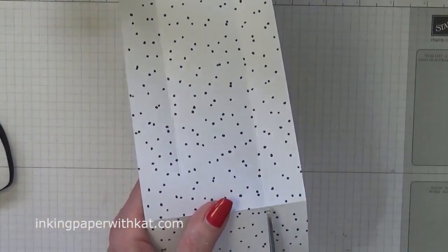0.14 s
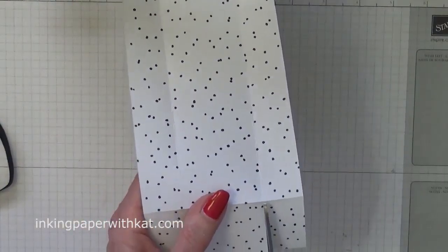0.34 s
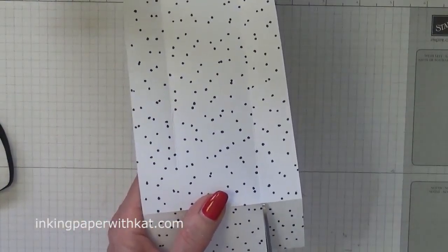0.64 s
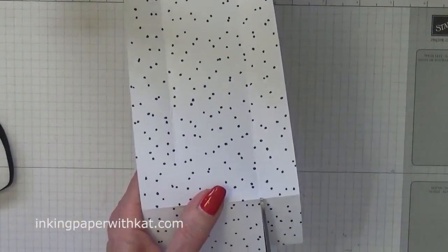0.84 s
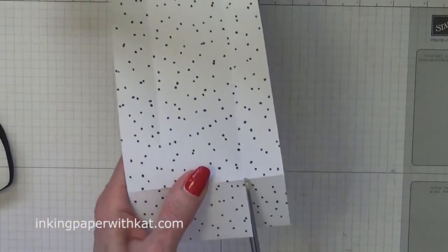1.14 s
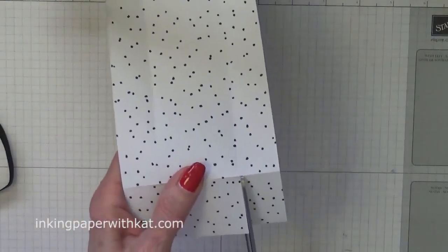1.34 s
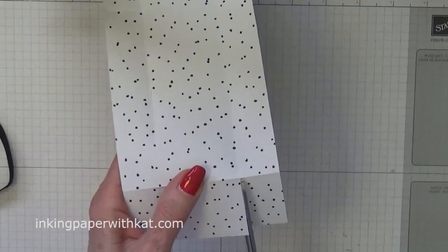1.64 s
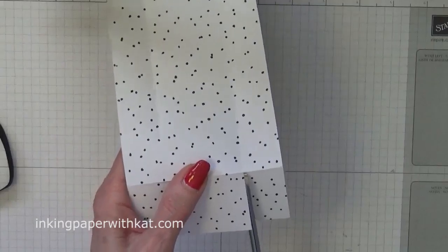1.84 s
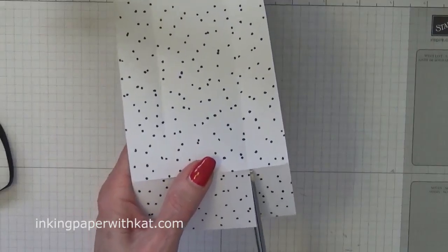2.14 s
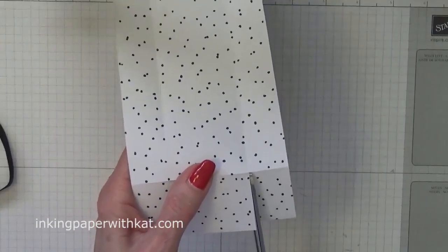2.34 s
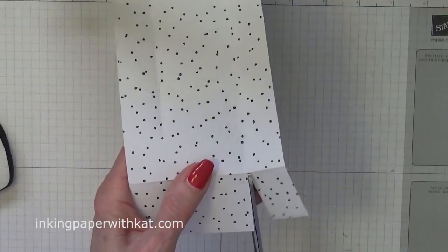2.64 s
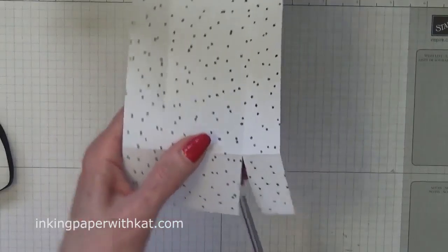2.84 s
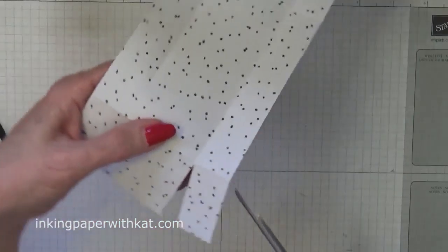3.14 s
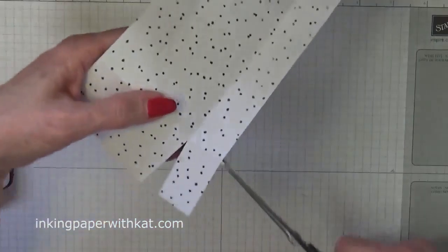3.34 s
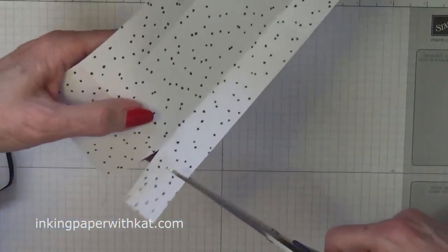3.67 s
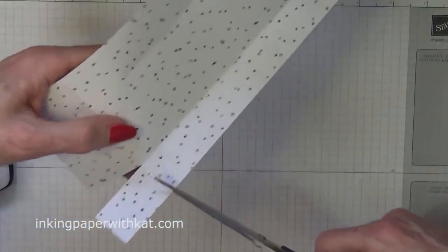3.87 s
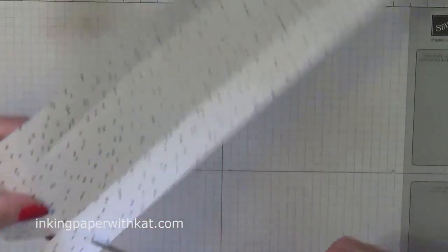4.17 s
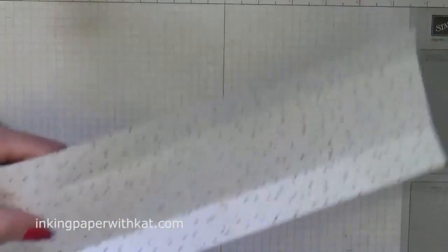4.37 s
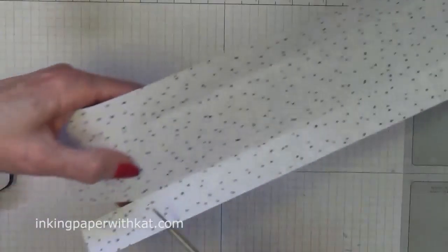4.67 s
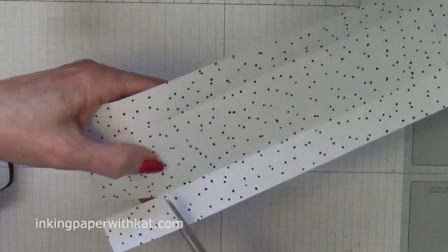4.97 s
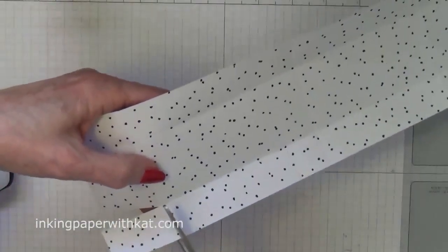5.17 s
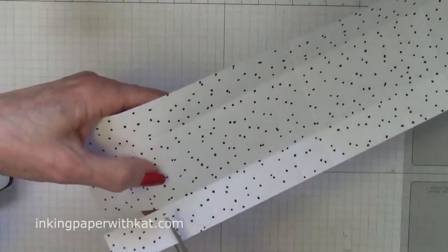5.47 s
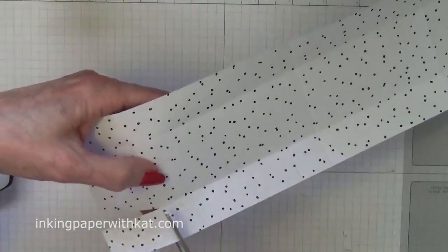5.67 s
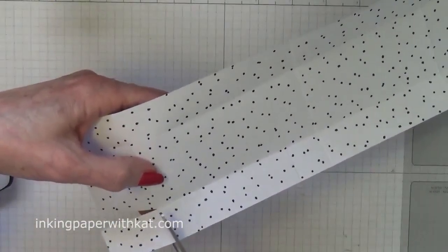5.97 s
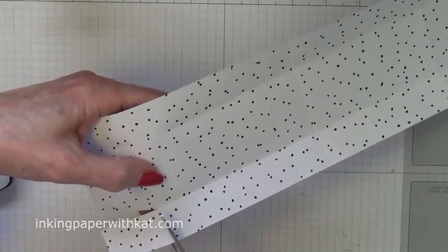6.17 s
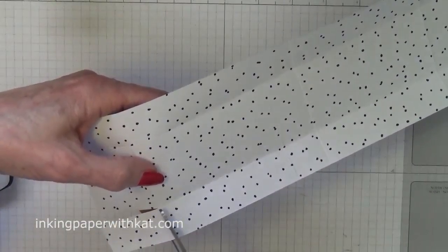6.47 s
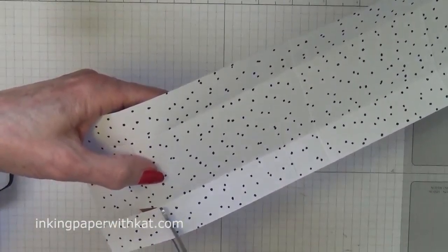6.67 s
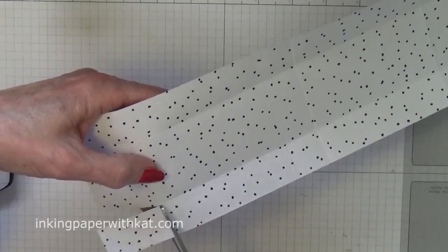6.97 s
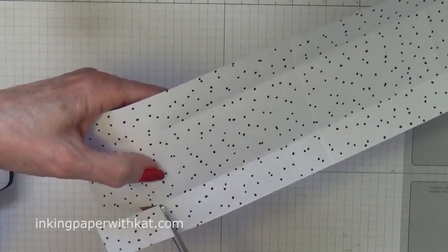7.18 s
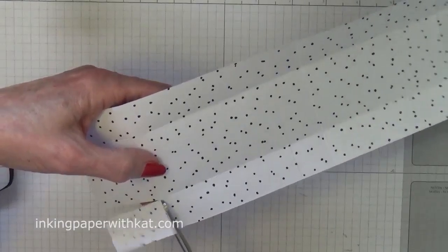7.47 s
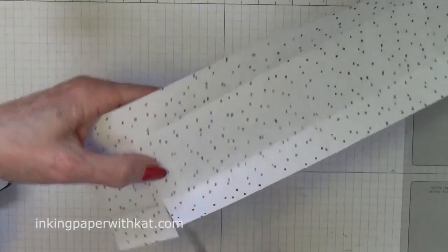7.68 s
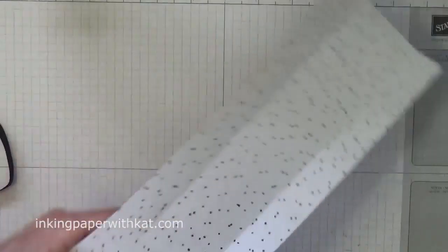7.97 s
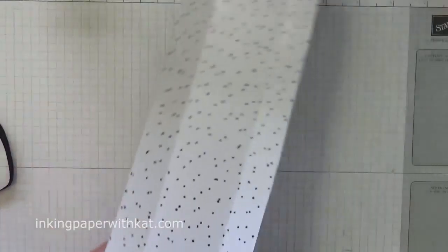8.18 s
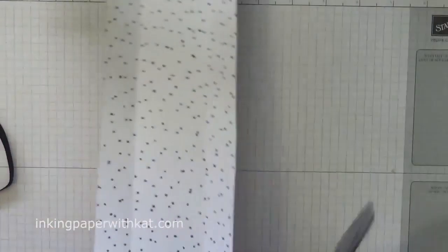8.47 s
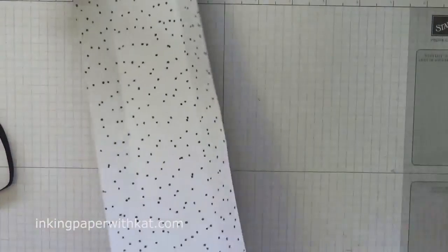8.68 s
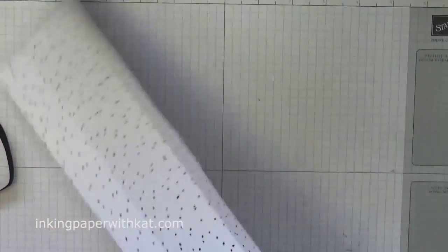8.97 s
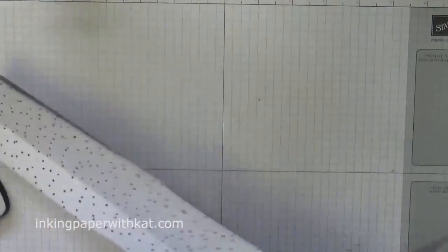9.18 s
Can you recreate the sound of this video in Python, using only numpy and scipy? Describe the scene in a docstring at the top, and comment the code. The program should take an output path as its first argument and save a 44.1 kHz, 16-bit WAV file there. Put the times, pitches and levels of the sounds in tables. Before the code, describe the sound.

Close by, above a table in a small room, scissors make sparse, soft snips in card, the blades sometimes clicking together. Louder sliding, crinkling and hollow popping take over as the sheet is shifted around. After a short lull the scissors bite again in quick little runs, then more card handling ends it. A low rumble, electrical hum, hiss and very faint ticking lie underneath.

```python
"""Scissors cutting card

Small scissors cut slowly into a creased sheet of card above a table in a small room. The blades part
the fibres in short cracks and now and then click together. The sheet buckles with hollow pops and rubs
on fingers, blades and table as it is turned. Behind it lie a low rumble, mains hum, hiss and faint ticks."""
import sys
import numpy as np
from scipy import signal
from scipy.fft import rfft, irfft
from scipy.io import wavfile

SR = 44100
rng = np.random.default_rng(int(sys.argv[2]) if len(sys.argv) > 2 else 0)


def waveform_to_disk(signal):
    """Save audio, clipped to [-1, 1], as 16-bit WAV at the path in sys.argv[1]."""
    frames = np.transpose(np.atleast_2d(signal))
    scaled = np.clip(frames, -1, 1) * 32767
    samples = np.round(scaled).astype(np.int16)
    wavfile.write(sys.argv[1], SR, samples)


N = 411012
TIME = np.arange(N) / SR
OPPOSITE_SIDES = np.array([[1], [-1]])  # plus on the left, minus on the right


def undb(db):
    """Turn decibels into a number to multiply by."""
    return 10 ** (np.asarray(db) / 20)


def level(x, db):
    """Scale a sound to an average (rms) level."""
    return x * undb(db) / np.sqrt(np.mean(x ** 2) + 1e-30)


def energy(x, db):
    """Give a sound as much energy as one second at this level."""
    return x * undb(db) / np.sqrt(np.sum(x ** 2) / SR + 1e-30)


def band(x, hz, kind, order=3):
    """Keep the lows, the highs or a band between."""
    return signal.sosfilt(signal.butter(order, hz, kind, fs=SR, output="sos"), x)


def ring(x, hz, width):
    """Make a sound ring at one pitch; narrower rings longer."""
    return signal.lfilter(*signal.iirpeak(hz, hz / width, fs=SR), x)


def colour(x, points, size=4096):
    """Shape the tone along a curve of (frequency [Hz], level [dB]) points."""
    hz, db = np.transpose(points)
    curve_db = np.interp(np.log(np.fft.rfftfreq(size, 1 / SR) + 1), np.log(hz), db)
    cepstrum = irfft(np.log(undb(curve_db)))
    # fold the filter so that it never sounds before its input
    cepstrum[1:size // 2] *= 2
    cepstrum[size // 2 + 1:] = 0
    response = irfft(np.exp(rfft(cepstrum)))
    return signal.fftconvolve(x, response)[:len(x)]


def add(out, start, x):
    """Mix a sound in at a start time in seconds."""
    i = int(start * SR)
    out[i:i + len(x)] += x[:N - i]


def clock(length):
    """The times within one event, plus 40 ms to ring out."""
    return np.arange(int(length * SR) + SR // 25) / SR


# The tone of the steady hiss: (frequency [Hz], relative level [dB])
AIR_TONE = [(38, -13), (65, -10), (126, -3), (150, -8), (236, -10.5), (268, -12.5), (286, -8.5),
            (378, -11.5), (459, -13), (568, -15), (1130, -15), (1770, -18), (3680, -21), (4460, -23),
            (11000, -26.5), (14300, -67), (22000, -120)]
def air(db=-60.56, side_db=-9):
    """Room air hisses; a second noise makes left and right differ."""
    centre, side = (level(colour(rng.standard_normal(N), AIR_TONE), db) for _ in range(2))
    return band(centre, 72, "high") + undb(side_db) * band(side, 160, "high", order=1) * OPPOSITE_SIDES


# How loud the deep rumble is: (time [s], level [dB])
RUMBLE_LEVELS = [(0, -68), (.4, -61.5), (1.05, -59), (1.4, -68), (1.75, -58), (2.1, -67), (2.6, -61.5),
                 (2.9, -65), (3.25, -57), (3.65, -57), (4.35, -68.5), (7.1, -69), (9.301, -67.5)]
# How loud the faint drone above it is: (time [s], level [dB])
DRONE_LEVELS = [(0, -69), (7, -74.5), (7.15, -61.5), (8.2, -66), (8.4, -78)]
def rumble(rumble_hz=44.7, drone_hz=80):
    """Two low, narrow bands of noise swell and sink."""
    out = np.zeros(N)
    for hz, width, curve in (rumble_hz, 13, RUMBLE_LEVELS), (drone_hz, 14, DRONE_LEVELS):
        noise = ring(ring(rng.standard_normal(N), hz, width), hz, width)
        out += level(noise, 0) * undb(np.interp(TIME, *np.transpose(curve)))
    return out


def mains_hum(hz=120, db=-72):
    """Mains power hums on one steady note."""
    return level(np.sin(2 * np.pi * hz * TIME), db)


def ticking(per_second=29.97, hz=3700, decay_s=.0015, db=-75, weak_db=-6, scatter_db=1.5):
    """Faint, fast ticks, strong and weak in turn."""
    out, t = np.zeros(N), clock(0)
    tick = t * np.exp(-t / decay_s) * np.sin(2 * np.pi * hz * t)
    for k, start in enumerate(np.arange(.0585, N / SR, 1 / per_second)):
        add(out, start, tick * undb(weak_db * (k % 2) + scatter_db * rng.standard_normal()))
    return level(out, db)


def room(x, low_fade_s=.32, high_fade_s=.23, echo_db=-8, delay_s=.0048):
    """The table and near walls add a short echo; its highs differ most between left and right."""
    t = np.arange(SR // 2) / SR
    centre, side = rng.standard_normal((2, len(t)))
    side = side * OPPOSITE_SIDES
    low = undb(2.5 - 60 * t / low_fade_s) * band(centre + undb(-5) * side, 3250, "low")
    high = undb(-60 * t / high_fade_s) * band(centre + undb(-1) * side, 2460, "high")
    tail = (low + high) * (t > delay_s)
    tail *= undb(echo_db) / np.sqrt(np.sum(tail ** 2) / 2)
    return x + signal.fftconvolve(x[None], tail, axes=1)[:, :N]


# The card rings in three ranges: body (low), middle and fizz (high). Each grip sets their pitches:
# (from time [s], body [Hz], middle [Hz], fizz [Hz])
GRIP_PITCHES = [(0, 640, 1930, 7000), (.5, 585, 3000, 6600), (.68, 860, 2300, 7560), (1.1, 585, 4700, 7600),
                (1.3, 1010, 2050, 8500), (2, 447, 2550, 9600), (2.4, 646, 3350, 8400),
                (3.3, 710, 1660, 8200), (3.62, 744, 3280, 7730), (4.45, 960, 5000, 8400),
                (4.56, 1000, 3200, 7600), (4.66, 680, 2830, 8700), (4.95, 965, 2830, 8900),
                (5.53, 490, 3280, 9800), (5.8, 990, 2810, 8700), (7.67, 606, 3100, 9300),
                (8.1, 1100, 3030, 9600), (8.7, 775, 1580, 8300), (8.85, 1020, 5400, 8900),
                (8.96, 1030, 3080, 8100), (9.02, 556, 3160, 9100)]
def grip(time, scatter=(.11, .057, .041)):
    """The card's three pitches as it is held now; every touch bends them a little."""
    held = [pitches for since, *pitches in GRIP_PITCHES if since <= time]
    return np.array(held[-1]) * np.exp(np.array(scatter) * rng.standard_normal(3))


# The overall tone of the card: (frequency [Hz], boost [dB])
CARD_TONE = [(100, -8.5), (250, -6), (420, -3), (700, -3), (950, -2.5), (1500, -2.5), (2300, 1.5),
             (3400, -0.5), (4400, 0), (5600, -1), (6900, -7.5), (8200, -7.5), (10800, -2)]
# Pitches at which the card and the blades in it ring: (pitch [Hz], width [Hz], relative level [dB])
CARD_RINGS = [(558, 48, 1.5), (765, 22, 2.5), (1064, 18, 0.5), (1350, 11, -61), (3150, 115, -2),
              (3570, 230, -3), (5500, 120, -13.5), (7800, 500, -5)]
def sheet(push, pitches, levels, ring_db, widths=(.24, .16, .11), bend=.018, edges_hz=(1300, 6000)):
    """A push sounds through the card, whose ringing shifts as it is bent and held."""
    x = colour(push, CARD_TONE)
    shifts = np.exp(bend * rng.standard_normal(len(CARD_RINGS)))
    x = x + undb(-1) * sum(undb(db) * ring(x, hz * shift, width)
                           for (hz, width, db), shift in zip(CARD_RINGS, shifts))
    x = x + sum(undb(db) * ring(x, hz, hz * width) for hz, width, db in zip(pitches, widths, ring_db))
    middle_db, body_db, fizz_db = levels
    body = energy(band(x, edges_hz[0], "low", order=5), body_db)  # the whole sheet
    middle = energy(band(x, edges_hz, "band", order=4), 0)  # the patch that moves
    fizz = energy(band(x, edges_hz[1], "high", order=5), fizz_db)  # single fibres
    return undb(middle_db) * (body + middle + fizz)


def fibres(size, per_second=14000, spread_db=2):
    """Fibres snap at random moments, some louder than others."""
    strengths = undb(spread_db * np.minimum(rng.exponential(size=size), 3))
    snaps = rng.standard_normal(size) * strengths
    return level(snaps * (rng.random(size) < per_second / SR), 0)


# Each slide of the sheet: (start [s], fastest moment [s], end [s],
# relative middle level [dB], body above middle [dB], fizz above middle [dB])
SLIDES = [(2.737, 2.795, 2.88, -59.5, -9, -0.5), (2.872, 2.903, 3.1, -64.5, -7, -4),
          (3.416, 3.478, 3.55, -69, 0.5, 0), (3.552, 3.595, 3.64, -55, 2.5, 0.5),
          (3.6, 3.65, 3.8, -57.5, -7.5, -3), (3.741, 3.984, 3.98, -54, -6, -5),
          (3.976, 4.022, 4.15, -50, -7, -1.5), (4.151, 4.171, 4.2, -52, -9.5, -7.5),
          (4.191, 4.253, 4.28, -67, -8, 2.5), (4.31, 4.336, 4.368, -51.5, -13, -5),
          (4.488, 4.509, 4.55, -61, -12, 7), (4.541, 4.562, 4.68, -49, -13, -3.5),
          (4.669, 4.668, 4.9, -52.5, 1.5, -2.5), (4.975, 5.013, 5.028, -56.5, -8.5, -0.5),
          (5.062, 5.073, 5.11, -55.5, -13, -1), (5.088, 5.125, 5.15, -61, -8.5, -1.5),
          (5.199, 5.255, 5.3, -71, 1, -5), (5.407, 5.443, 5.52, -61.5, -1, -5.5),
          (5.541, 5.566, 5.72, -69.5, 1, -3.5), (5.89, 5.907, 5.94, -73, -0.5, -4),
          (5.979, 6.014, 6.12, -80.5, 6, -14), (6.762, 6.903, 7.2, -68, -8.5, -6),
          (7.496, 7.521, 7.62, -59.5, -14, -3), (7.628, 7.66, 7.71, -53, -6.5, -2),
          (7.678, 7.718, 7.81, -55, -3.5, -1), (8.583, 8.604, 8.79, -61, -10, 3),
          (8.779, 8.81, 8.88, -52.5, -4.5, 0.5), (8.842, 8.992, 9.04, -57, -10, 5.5),
          (9.029, 9.08, 9.21, -56.5, -8, 2.5), (9.2, 9.277, 9.36, -64, -2, 4)]
def rubs(catch_db=2.5, catch_hz=170, lurch_db=1.54, lurch_hz=55, swell=.71, crinkle_db=-7):
    """Sliding card catches, lurches and crinkles; its tiny snaps grow louder with speed."""
    out = np.zeros(N)
    for start, fastest, end, *levels in SLIDES:
        t = clock(end - start)
        speed = np.interp(start + t, [start, fastest, end], [0, 1, 0])
        catches, lurches = (np.interp(t * hz, np.arange(len(t)), rng.standard_normal(len(t)))
                            for hz in (catch_hz, lurch_hz))
        friction = undb(catch_db * catches + lurch_db * lurches) * fibres(len(t))
        crinkles = undb(crinkle_db) * fibres(len(t), per_second=320)
        push = speed ** swell * (friction + crinkles)
        add(out, start, sheet(push, grip(fastest), levels, ring_db=(5.5, 4.5, 3)))
    return out


# Each buckle or knock of the sheet: (time [s], body [Hz], middle [Hz], relative middle level [dB],
# body above middle [dB], fizz above middle [dB], change per flap [dB])
BUCKLES = [(.149, 626, 1820, -82.5, 12.5, -20, -20), (1.1567, 890, 4880, -76, 0, -3, -20),
           (3.414, 710, 1420, -71.5, 13.5, -8, -18), (3.548, 704, 1770, -54, 6, -38, -2.5),
           (4.667, 1090, 2810, -42, -6.5, -25, -20), (7.533, 1310, 2740, -52.5, -4.5, -5.5, -12),
           (8.183, 650, 3250, -73, 2, -1, -6), (8.718, 865, 1940, -62.5, 0, -6, -6),
           (8.806, 850, 1580, -57, -1, -11, -6.5), (8.985, 1030, 3300, -53.5, -10.5, -7, -19)]
def pops(rise_s=.00079, snap_s=.0013, flutter_db=-16, flutter_s=.014, flap_s=.014, fizz_hz=8300):
    """The card snaps through and flaps back twice, fluttering as its bending waves fade."""
    out, t = np.zeros(N), clock(0)
    fade = np.exp(-t / snap_s) + undb(flutter_db) * np.exp(-t / flutter_s)
    waves = np.minimum(t / rise_s, 1) * fade
    for start, body_hz, middle_hz, db, body_db, fizz_db, flap_db in BUCKLES:
        pitches = (body_hz, middle_hz, fizz_hz)
        for flap in range(3):
            # a broad patch moves at once, so it sounds rounder than a tearing fibre
            push = band(waves * rng.standard_normal(len(t)), [380, 4800], "band")
            levels = (db + flap * flap_db, body_db, fizz_db)
            add(out, start + flap * flap_s, sheet(push, pitches, levels, ring_db=(8, 6, 3)))
    return out


# Pitches at which the blades ring: (pitch [Hz], width [Hz], relative level [dB])
BLADE_RINGS = [(2420, 270, -11), (3120, 220, -3), (3560, 220, -1), (5100, 500, -14)]
# Each time the blades click together: (time [s], energy [dB])
BLADE_CLICKS = [(.851, -71.5), (1.535, -74.5), (2.466, -74.5), (8.378, -74)]
def clicks(contact_s=.0013, scrape_db=-26):
    """Steel meets steel: a brief scrape rings the blades, and the fingers keep the ring short."""
    out, t = np.zeros(N), clock(0)
    for start, db in BLADE_CLICKS:
        scrape = t * np.exp(-t / contact_s) * rng.standard_normal(len(t))
        steel = sum(undb(ring_db) * ring(scrape, hz, width) for hz, width, ring_db in BLADE_RINGS)
        add(out, start, energy(steel + undb(scrape_db) * scrape, db))
    return out


# The blades or a crease move on in runs of bites: (first bite [s], last bite [s], bite length [s],
# first relative level [dB], last relative level [dB], body above middle [dB], fizz above middle [dB])
BITE_RUNS = [(0.114, 0.133, 0.012, -72.5, -69.5, -3.5, 2.5), (0.366, 0.418, 0.016, -65.5, -72, 0, -1),
             (0.549, 0.568, 0.0055, -72.5, -63, -6.5, -5), (.741, 0.753, 0.011, -72, -67.5, -2.5, 5),
             (1.361, 1.384, 0.023, -64.5, -71.5, -8, -6), (3.988, 4.03, 0.01, -54, -67, -3.5, 1),
             (4.528, 4.55, 0.0065, -56, -48, -22, -1), (6.794, 6.833, 0.0066, -66.5, -68, -13, -4.5),
             (6.864, 6.88, 0.0091, -68, -67.5, -18, -3), (6.928, 6.95, 0.0083, -82, -72.5, -14, -5),
             (7.065, 7.137, 0.0082, -73.5, -72, -7.5, -3), (7.196, 7.254, 0.0022, -78, -74, -10, 3),
             (7.272, 7.323, 0.02, -65.5, -60.5, -12, 4), (7.777, 7.791, 0.015, -61, -55.5, -14, -4.5),
             (8.885, 8.906, 0.013, -57, -57, -21, 0)]
def bites(gap_s=.022, jitter_s=.0005):
    """Split each run into nearly even cracks that grow or fade with the squeeze of the hand."""
    for first, last, length, first_db, last_db, body_db, fizz_db in BITE_RUNS:
        steps = max(1, round((last - first) / gap_s))
        for along in np.linspace(0, 1, steps + 1):
            start = first + along * (last - first) + jitter_s * rng.standard_normal()
            yield start, length, first_db + along * (last_db - first_db), body_db, fizz_db


# Single sharp cracks of the fibres: (time [s], length [s],
# relative middle level [dB], body above middle [dB], fizz above middle [dB])
FIBRE_CRACKS = [(.047, 0.025, -72, -4, 1), (.702, 0.011, -70, -5, 0.5), (1.149, 0.0089, -69, 4.5, 7.5),
                (1.561, 0.0093, -75, -18, -3), (2.114, 0.005, -60.5, -10.5, 4),
                (2.554, 0.022, -72, -23, 1.5), (3.55, 0.0016, -63.5, 8, 12),
                (3.98, 0.0056, -54.5, -6, -2.5), (4.104, 0.018, -55, -15, -1.5),
                (4.308, 0.0037, -62.5, -22, -8), (4.54, .012, -56, -9, 4), (7.353, .0065, -55, -12, 4),
                (7.567, 0.011, -57.5, -0.5, 3.5), (7.625, 0.0053, -62.5, -6, -1.5),
                (7.683, 0.011, -56, -7.5, -3), (7.733, 0.0062, -59, 3.5, 4), (8.276, 0.0014, -70.5, -14, 2),
                (8.294, 0.016, -65, -2.5, -2), (8.378, 0.0022, -57.5, -12.5, -4),
                (8.593, 0.012, -62.5, -4, -4), (8.946, 0.0036, -58, -10.5, -1),
                (8.975, .003, -55, -19, 9.5), (9.058, .0054, -62.5, 0.5, 7.5),
                (9.28, 0.0042, -64.5, -1.5, -1)]
def cracks(rise_s=.0025, release_s=.0031, edge_force=.43, drag_db=-23, drag_s=.017):
    """The blades bite, a bundle of fibres quickly gives way, and the blades stick again."""
    out = np.zeros(N)
    for start, length, *levels in [*FIBRE_CRACKS, *bites()]:
        t = clock(length)
        after = np.maximum(t - length, 0)
        force = np.interp(t, [0, length / 2, length], [edge_force, 1, edge_force])
        tear = force * np.minimum(t / rise_s, 1) * np.exp(-after / release_s)
        # the freshly cut edge drags briefly along the blade
        drag = undb(drag_db) * np.exp(-after / drag_s) * (t > length)
        push = (tear + drag) * fibres(len(t))
        add(out, start, sheet(push, grip(start), levels, ring_db=(6, 6.5, 6)))
    return out


def scene(card_db=-1, left_louder_db=.5):
    """The card is cut almost straight ahead, over the quiet background of the room."""
    card = undb(card_db) * (cracks() + pops() + rubs())
    cutting = room(card + clicks()) * undb(OPPOSITE_SIDES * left_louder_db / 2)
    return cutting + air() + rumble() + mains_hum() + ticking()


def record(dry, top_hz=10950):
    """The very highest sounds are cut off steeply."""
    return signal.sosfilt(signal.ellip(10, .2, 70, top_hz, fs=SR, output="sos"), dry)


dry = scene()
out = record(dry)
waveform_to_disk(out)
```